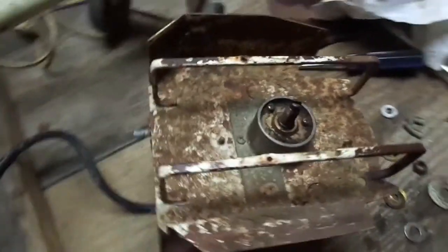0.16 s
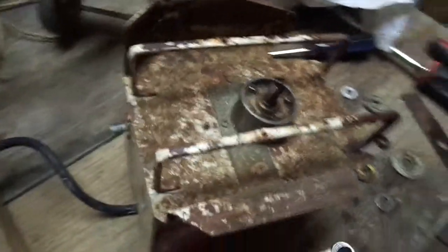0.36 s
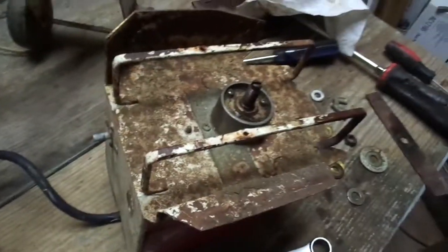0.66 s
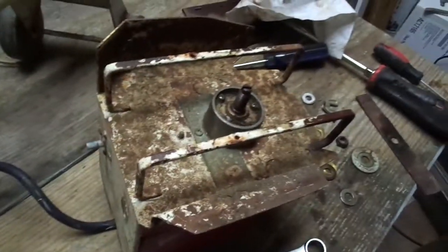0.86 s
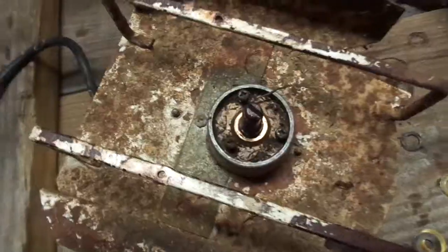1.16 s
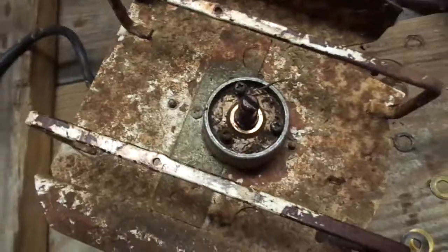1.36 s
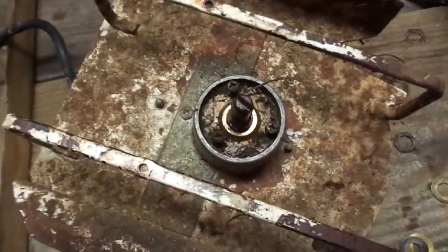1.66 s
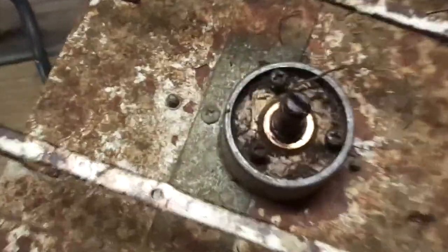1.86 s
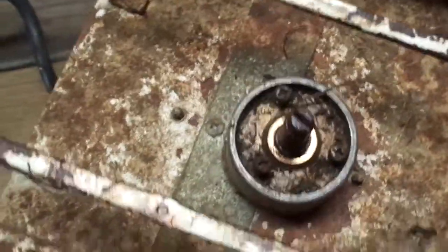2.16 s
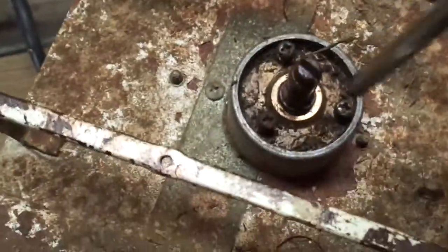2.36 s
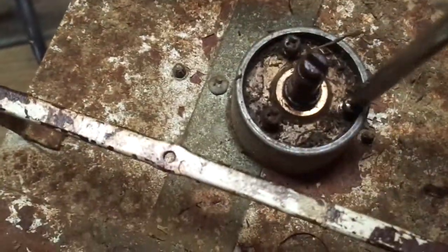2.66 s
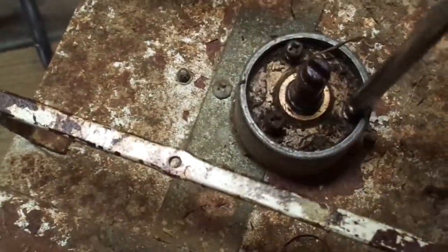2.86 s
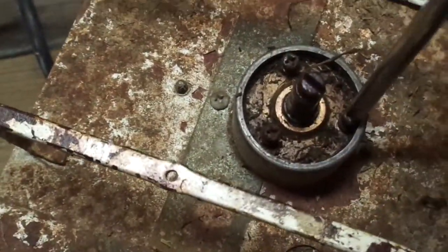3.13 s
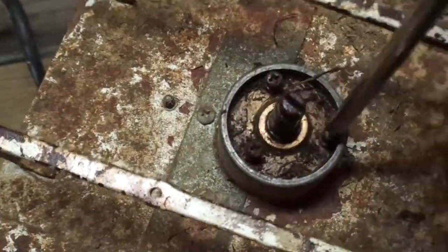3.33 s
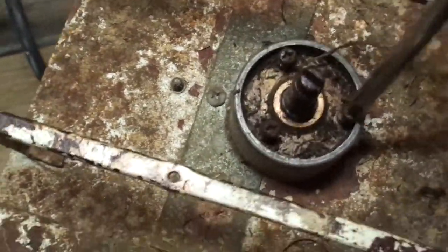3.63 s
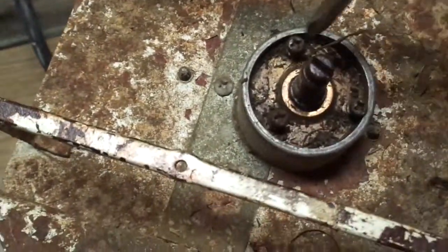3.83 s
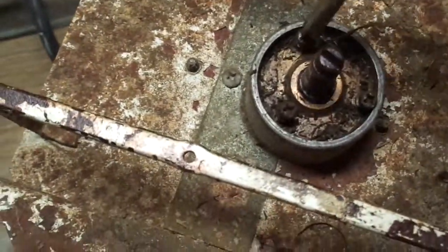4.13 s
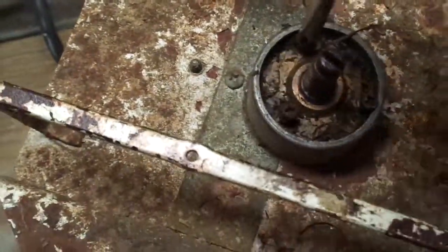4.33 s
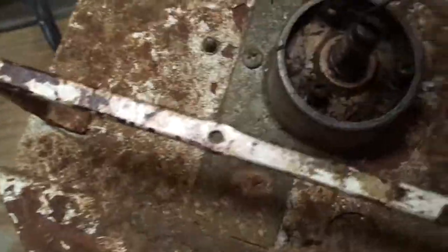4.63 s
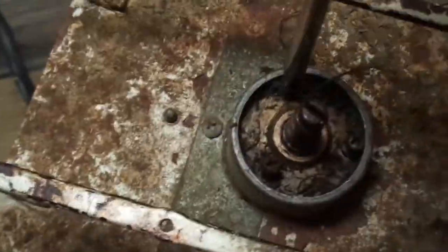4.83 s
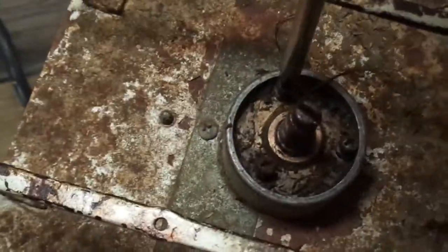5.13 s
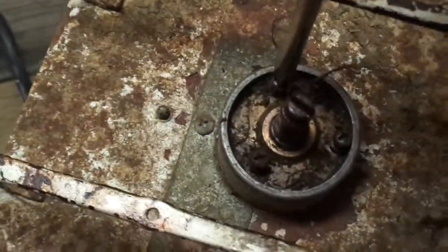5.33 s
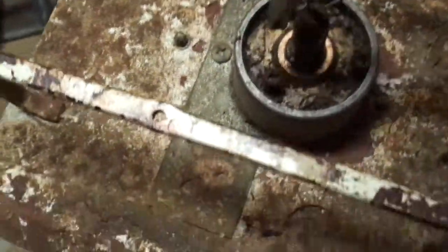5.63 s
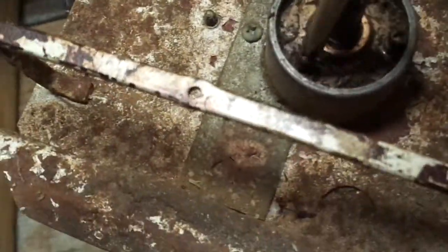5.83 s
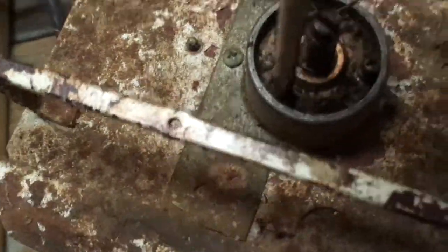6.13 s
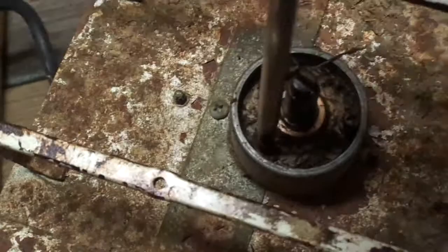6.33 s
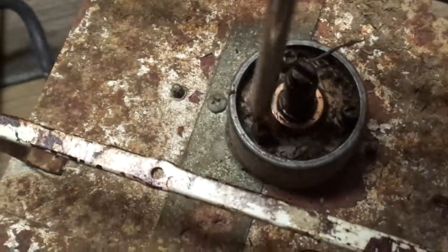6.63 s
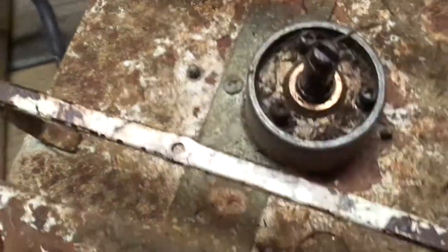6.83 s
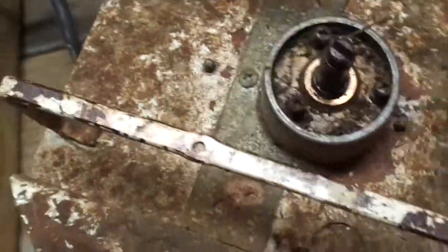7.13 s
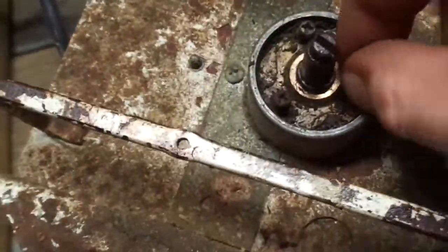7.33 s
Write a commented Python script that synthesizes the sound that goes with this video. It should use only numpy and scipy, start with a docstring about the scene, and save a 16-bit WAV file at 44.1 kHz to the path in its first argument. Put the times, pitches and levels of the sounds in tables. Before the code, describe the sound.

A brief brushing rustle over hum, a blank silence, then close ticks, creaks, metal clacks, faint screwdriver scrapes and a loud clatter on a sheet-metal housing.

```python
"""On a wooden bench in a workshop, a screwdriver picks and taps at the bearing rim of a motor in sheet metal.
Close to the microphone, the hand-held recorder ticks, creaks and thuds in the grip: snaps, slips and low pushes.
Loose steel parts clack against the housing; cracks set decaying modes ringing, with a short dull echo.
A brushing rustle (coloured noise) over mains hum comes first, then half a second of silence,
then a faint steady whine (sines) and workshop air (noise) under everything."""
import sys
import numpy as np
from scipy import signal
from scipy.fft import rfft, irfft
from scipy.io import wavfile

SR = 44100
rng = np.random.default_rng(int(sys.argv[2]) if len(sys.argv) > 2 else 0)


def int16_out(signal):
    """Quantize to a 16-bit WAV file."""
    q = np.round(np.clip(np.atleast_2d(signal).T, -1, 1) * 32767)
    wavfile.write(sys.argv[1], SR, q.astype(np.int16))


N = 330390
T = np.arange(N) / SR  # time in the scene, s
AGE = np.arange(16384) / SR  # time since a contact, s


def amp(db):
    """Decibels to gain."""
    return 10 ** (np.asarray(db) / 20)


def unit(x):
    """Scale to rms 1."""
    return x / np.sqrt(np.mean(x ** 2))


def add(out, s, x):
    """Mix x into out from time s on."""
    i = max(int(s * SR), 0)
    out[i:i + len(x)] += x[:len(out) - i]


def band(x, lo_hz, hi_hz, order=2):
    """Causal band-pass."""
    edges = [lo_hz, min(hi_hz, SR / 2 - 1000)]
    return signal.sosfilt(signal.butter(order, edges, "band", fs=SR, output="sos"), x)


def colour(x, points):
    """Shape the spectrum of x by (f/Hz, level/dB) points, joined along log frequency."""
    hz, db = np.transpose(points)
    f = np.maximum(np.fft.rfftfreq(len(x), 1 / SR), 1)
    gain = amp(np.interp(np.log(f), np.log(hz), db))
    return irfft(rfft(x) * gain, len(x))


def walk(rate):
    """Random drift of spread near 1, with `rate` new values a second joined by straight lines."""
    knots = rng.standard_normal(4096)
    return np.interp(T * rate, np.arange(len(knots)), knots)


def fade(t60):
    """Decay by 60 dB in t60 seconds."""
    return np.exp(-np.log(1000) * AGE / t60)


# the opening brush, before trims: t/s, mids level/dB, treble level/dB
RUSTLE_LEVELS = [(0.0, -45, -50), (0.066, -39.5, -44.5), (0.08, -39.5, -47), (0.104, -51, -49.5),
                 (0.248, -54, -58), (0.316, -50, -52.5), (0.348, -55.5, -59), (0.57, -67.5, -80)]
# tone of the brush: f/Hz, relative level/dB per Hz
RUSTLE_COLOUR = [(290, -43), (500, -13.5), (724, -8), (788, -2), (859, -8.5), (1350, -3.5), (1990, -4),
                 (2360, -12.5), (3000, -18), (3510, -14), (4600, -17.5), (5160, -16.5), (11900, -29.5),
                 (15000, -31.5)]


def rustle(grain_db=3, mid_trim_db=-1, treble_trim_db=-1, low_hz=1150, split_hz=2500):
    """A soft brushing that dies away: grainy noise whose mids and treble follow their own levels."""
    s, mid_db, treble_db = np.transpose(RUSTLE_LEVELS)
    grains = colour(rng.standard_normal(N) * amp(grain_db * walk(500)), RUSTLE_COLOUR)
    mids = unit(band(grains, low_hz, split_hz, order=2))
    treble = unit(band(grains, split_hz, 14000, order=3))
    mid_gain = amp(np.interp(T, s, mid_db) + mid_trim_db)
    treble_gain = amp(np.interp(T, s, treble_db) + treble_trim_db)
    return mids * mid_gain + treble * treble_gain


# mains hum before the pause: f/Hz, mean rms level/dB
HUM = [(119.8, -72), (239.6, -63), (480, -70), (599.9, -76.5)]
# faint whine after the pause: f/Hz, mean rms level/dB
WHINE = [(177, -80), (358.5, -71), (719.4, -61), (1438.9, -66), (1799, -77)]


def tones(lines, waver=0.4, flutter_db=.5):
    """Electrical tones: sines that waver slightly in phase (radians) and level."""
    out = np.zeros(N)
    for hz, db in lines:
        level = np.sqrt(2) * amp(db + flutter_db * walk(19))
        out += level * np.sin(2 * np.pi * hz * T + waver * walk(4.6))
    return out


# workshop air before the pause: f/Hz, relative level/dB per Hz
EARLY_AIR = [(18, -49), (30, -21), (116, -15), (195, -18.5), (240, -18), (384, -18.5), (472, -16),
             (716, -16), (1200, -20.5), (15000, -30.5)]
# workshop air after the pause: f/Hz, relative level/dB per Hz
AIR = [(25, 0), (80, -18), (160, -9), (260, -6), (380, -3.5), (600, -3), (1000, -4), (1800, -2), (3000, -3),
       (4300, -3), (6000, -8.5), (10000, -10.5), (15500, -13.5)]
EARLY_AIR_DB, AIR_DB = -58, -58.5  # rms


def air(points, db):
    """Steady background hiss: coloured noise."""
    return unit(colour(rng.standard_normal(N), points)) * amp(db)


def grip_hiss(db=-64, end=2.1, flutter_db=-3.5, low_hz=10000, swell_s=1.19, swell_length=0.026, swell_db=-55):
    """A faint high rubbing while the hand settles after the pause: fluttering noise with one brief swell."""
    rub = rng.standard_normal(N) * amp(flutter_db * walk(19.4))
    steady = amp(db) * unit(band(rub, low_hz, 14300, order=1)) * (T < end)
    swell = amp(swell_db) * np.exp(-((T - swell_s) / swell_length) ** 2)
    return steady + swell * unit(band(rub, 3200, 13000, order=1))


def crack(lo_hz, hi_hz, t60, order=2):
    """Brief chatter of a hard contact: decaying random signs within a band."""
    x = band(rng.choice([-1., 1.], len(AGE)) * fade(t60), lo_hz, hi_hz, order)
    return unit(x) * np.sqrt(np.mean(fade(t60) ** 2))


# dry ticks close to the microphone: t/s, relative level/dB, centre f/Hz, ping f/Hz, ping t60/s
TICKS = [(1.114, -27.5, 9800, 4500, .004), (1.1183, -16, 8600, 4430, 0.0035),
         (1.347, -16.5, 5200, 4430, 0.026), (1.4364, -32, 4400, 4800, .016),
         (1.4422, -22.5, 4200, 4800, 0.023), (1.464, -21, 3900, 4300, 0.041),
         (1.667, -20, 5060, 4200, 0.027), (1.7412, -20, 4070, 2820, 0.026), (4.4159, -37, 4600, 4400, .015),
         (5.277, -9, 17000, 4230, 0.017)]


def ticks(snap_t60=0.0029, spread=1.89, ping_db=-18, fizz_db=-33, fizz_t60=0.1):
    """Stiff little snaps with a brief thin ping (a decaying sine) and a fizzy tail."""
    out = np.zeros(N)
    for s, db, hz, ping_hz, ping_t60 in TICKS:
        lo_hz, hi_hz = hz / spread, hz * spread
        snap = crack(lo_hz, hi_hz, snap_t60)
        fizz = amp(fizz_db) * crack(lo_hz, hi_hz, fizz_t60, order=1)
        ping = amp(ping_db) * np.sin(2 * np.pi * ping_hz * AGE) * fade(ping_t60)
        add(out, s, amp(db) * (snap + fizz + ping))
    return out


def ring(modes, scatter_db=4.5, neighbour_db=-7, neighbour_span=0.082, crowd_hz=4000, count=8):
    """Free ring of struck metal; each mode has weaker neighbours, which count for more in the treble."""
    hz, db, t60 = np.transpose(modes)
    near_hz = hz * (1 + neighbour_span * rng.uniform(-1.223, 1, (count, len(hz))))
    near_db = db + neighbour_db + 20 * np.log10(np.minimum(hz / crowd_hz, 1))
    hz = np.r_[hz, near_hz.ravel()]
    db = np.r_[db, np.tile(near_db, count)]
    t60 = np.tile(t60, count + 1)
    # every point of contact weighs the modes differently
    size = amp(db + scatter_db * rng.standard_normal(len(hz)))
    phase = rng.uniform(0, 2 * np.pi, len(hz))
    waves = np.sin(np.float32(2 * np.pi * hz[:, None] * AGE + phase[:, None]))
    decays = np.exp(np.float32(-np.log(1000) * np.minimum(AGE / t60[:, None], 2)))
    return size @ (waves * decays) / np.sqrt(np.sum(size ** 2) / 2)


# the housing's countless weaker modes: f/Hz, relative level/dB per Hz, t60/s
PLATE = [(120, -9, 0.88), (265, -19, 0.19), (425, 7, 0.12), (995, 10, 0.11), (2000, 8.5, 0.13),
         (3580, 3.5, 0.14), (5000, 3, 0.11), (7000, -5, 0.18), (11000, -8, 0.18), (16000, -64, .06)]


def plate():
    """Dense ring of the sheet metal: noise bands that decay separately, longest at the bottom."""
    hz, db, t60 = np.transpose(PLATE)
    noise = colour(rng.standard_normal(len(AGE)), np.c_[hz, db])
    spectrum = rfft(unit(noise))
    log_f = np.log(np.fft.rfftfreq(len(AGE), 1 / SR) + 1)
    out = np.zeros(len(AGE))
    for share, decay in zip(np.eye(len(hz)), t60):
        weight = np.interp(log_f, np.log(hz), share)  # overlapping bands that add up to one
        out += irfft(spectrum * weight) * fade(decay)
    return out


# modes of the rim and the loose steel parts, by part: f/Hz, relative level/dB, t60/s
PART_MODES = {"rim": [(488, -5.5, .15), (637, -12, .14), (855, -10, .15), (1242, -11, .12), (1348, -3, .15),
              (1501, -12, .12), (1654, 2, .17), (1846, -5, .09), (2040, -12, .08), (2540, -11, .07),
              (4230, -1, .035)], "bar": [(667, -6, .15), (1340, -6, .19), (3531, -2, .12), (3630, -2, .1),
              (3789, -5, .09), (4188, -5, .08), (4495, -4, .08), (5062, -1, .085), (5400, -7, .07),
              (8800, -19, .06)], "washer": [(3520, -9, .08), (3800, -9, .08), (4312, -3, .07),
              (5921, -2, .07), (6045, 0, .09), (7364, -9, .05), (9496, -8, .06), (9840, -6, .05),
              (11200, -9, .04), (12900, -8, .04), (14500, -9, .04)]}
# hiss of grit under the blade: f/Hz, relative level/dB per Hz
GRIT = [(500, 6), (2000, 3), (4400, 11.5), (6500, 7), (10000, 6.5), (12500, 13.5), (14000, 9), (15600, 2)]


def scrape(swell, ring_db, hiss_db, grain_db=4.0, body_db=-10, low_hz=650, dull_hz=4500):
    """Dense tiny slips swell and fade: they hiss at the blade and ring the rim and housing."""
    metal = ring(PART_MODES["rim"], count=2) + amp(body_db) * plate()
    metal = band(metal, low_hz, dull_hz, order=1)
    grains = rng.standard_normal(len(AGE)) * amp(grain_db * rng.standard_normal(len(AGE)))
    slips = swell * unit(grains)
    body = signal.fftconvolve(slips, metal)[:len(AGE)]
    hiss = colour(slips, GRIT)
    return np.std(slips) * (amp(ring_db) * unit(body) + amp(hiss_db) * unit(hiss))


# twirls of the screwdriver: first stroke t/s, last stroke t/s, relative rim ring level/dB, relative hiss level/dB
TWIRLS = [(2.668, 2.741, -48, -72), (2.995, 3.08, -57, -67), (3.423, 3.659, -61.5, -69),
          (4.749, 5.21, -60.5, -57), (6.236, 6.514, -53, -59.5)]
# short rasps of grit: start t/s, rise t/s, relative hiss level/dB
RASPS = [(1.123, 0.0036, -36), (1.288, 0.0036, -46.5), (2.756, .011, -50), (2.832, 0.004, -48.5),
         (2.99, 0.0056, -53), (4.322, 0.0053, -50.5), (4.339, .005, -52), (4.406, .005, -47.5),
         (4.428, 0.0062, -50), (4.768, 0.0049, -49), (4.841, 0.0063, -54), (6.027, .01, -56.5),
         (6.149, 0.0059, -43), (6.638, 0.0047, -52.5)]


def scrapes(strokes_per_s=11.2, half_stroke_s=0.032, scatter_db=6.5, rasp_ring_db=-19.5):
    """Even twirl strokes scrape the rim, each a little different; grit catches fast, lets go slowly and hisses."""
    out = np.zeros(N)
    stroke = np.sin(np.pi * np.minimum(AGE / (2 * half_stroke_s), 1)) ** 4
    for first, last, ring_db, hiss_db in TWIRLS:
        count = round((last - first) * strokes_per_s) + 1
        for s in np.linspace(first, last, count):
            size = amp(scatter_db * rng.standard_normal())
            add(out, s - half_stroke_s, size * scrape(stroke, ring_db, hiss_db))
    for s, rise, db in RASPS:
        catch = AGE / rise * np.exp(1 - AGE / rise)
        add(out, s, scrape(catch, db + rasp_ring_db, db))
    return out


# the grip creaks: t/s, slips per second, relative slip level/dB
CREAK = [(1.471, 240, -44), (1.529, 393, -40.5), (1.645, 470, -35.5), (1.69, 217, -45), (1.721, 60, -35.5),
         (1.929, 30, -37)]


def creak(low_hz=3100, slow_top_hz=4300, hz_per_slip_rate=3.3, scatter_db=2.0, gain_db=3, slip_t60=0.0084,
          unevenness=.33):
    """Stick and slip in the grip: a fast run of tiny ragged snaps that slows to single, duller ones."""
    s, rate, db = np.transpose(CREAK)
    out, now = np.zeros(N), s[0]
    for gap, size, *chatter in rng.standard_normal(size=(200, 256)):
        if now >= s[-1]:
            break
        speed = np.interp(now, s, rate)
        top_hz = slow_top_hz + hz_per_slip_rate * speed
        snap = band(np.sign(chatter) * fade(slip_t60)[:len(chatter)], low_hz, top_hz, order=3)
        add(out, now, snap * amp(np.interp(now, s, db) + gain_db + scatter_db * size))
        now += np.exp(unevenness * gap) / speed
    return out


# blows: t/s, what is struck, relative body level/dB, relative crack level/dB, crack centre f/Hz
BLOWS = [(1.969, "housing", -32.5, -37, 3300), (1.9784, "housing", -33.5, -34, 2900),
         (1.983, "housing", -34.5, -28, 2660), (2.024, "washer", -36, -34, 3380),
         (2.027, "washer", -37, -21, 3700), (2.0719, "bar", -29, -28, 3350),
         (2.1523, "washer", -38.5, -22, 5000), (3.194, "rim", -47.5, -46, 4400),
         (3.534, "rim", -46.5, -47, 4400), (5.0296, "rim", -37.5, -22.5, 3200),
         (5.32, "rim", -53, -43, 5470), (5.3336, "housing", -41.5, -35, 3300),
         (5.776, "rim", -47, -28, 7000), (5.9322, "rim", -41.5, -32, 4600),
         (6.1193, "rim", -54.5, -45, 4540), (6.9738, "bar", -23, -23, 3270),
         (6.9935, "bar", -27, -30.5, 3760), (7.0452, "housing", -24, -14, 1700),
         (7.05, "housing", -15, -10.5, 2740), (7.06, "housing", -22, -18.5, 2000),
         (7.0702, "housing", -30, -19.5, 2200), (7.1485, "housing", -28.5, -41, 2110)]
# main modes of the housing: f/Hz, relative level/dB, t60/s
HOUSING_MODES = [(387, 0, .2), (465, -4, .16), (495, -1, .18), (640, -4, .16), (675, -1, .18),
                 (772, -5, .15), (860, -5, .16), (985, 2, .17), (1055, -6, .16), (1207, -1, .18),
                 (1340, 0, .19), (1515, -1, .14), (1582, -2, .18), (1773, -1, .14), (1997, 0, .16),
                 (2080, -5, .12), (2412, -6, .16), (2535, -1, .14), (2783, -2, .16), (2903, -1, .13),
                 (3140, -5, .12), (3364, -2, .12)]
# how much louder a struck part rings, by part: relative level/dB
PART_DB = {"rim": 5, "bar": 0, "washer": 8.5}
# how high the housing answers, by what is struck: f/Hz
BRIGHT_HZ = {"rim": 3200, "bar": 1580, "washer": 4200, "housing": 3620}


def blows(modes_db=-2, dense_db=2.0, crack_t60=0.013, crack_spread=2.02, low_hz=390):
    """Each blow cracks, rings the part hit and shakes the housing, as high up as what is struck allows."""
    out = np.zeros(N)
    for s, part, db, crack_db, crack_hz in BLOWS:
        housing = amp(modes_db) * ring(HOUSING_MODES, count=0) + amp(dense_db) * plate()
        body = band(housing, low_hz, BRIGHT_HZ[part]) / np.sqrt(2)
        if part in PART_MODES:
            part_ring = ring(PART_MODES[part], neighbour_db=-4.0, neighbour_span=.09)
            body = body + amp(PART_DB[part]) * part_ring
        contact = crack(crack_hz / crack_spread, crack_hz * crack_spread, crack_t60, order=3)
        add(out, s, amp(db) * body + amp(crack_db) * contact)
    return out


def room(x, db=-23, t60=0.28, low_hz=350, top_hz=2200, delay=0.0035):
    """The short, dull echo of a cluttered workshop: convolution with decaying noise."""
    response = band(rng.standard_normal(len(AGE)), low_hz, top_hz) * fade(t60) * (AGE > delay)
    response = response / np.sqrt(np.sum(response ** 2))
    return amp(db) * signal.fftconvolve(x, response)[:N]


# firm bumps of hand and bench: t/s, peak level/dB
THUDS = [(1.974, -38.5), (4.464, -46.5), (6.106, -48.5), (6.154, -53), (6.34, -55), (6.432, -51),
         (6.495, -43), (6.59, -36)]
# spells of lighter bumps as the grip shifts: from t/s, to t/s, typical peak level/dB
FIDGETS = [(4.7, 5.35, -67), (5.9, 6.55, -62)]


def thuds(low_share=0.31, firm_db=-36, firm_hz=490, db_per_octave=18, bumps_per_s=13, scatter_db=2):
    """Single dull pushes through bench and recorder case; the firmer the push, the higher it reaches."""
    out, bumps = np.zeros(N), list(THUDS)
    for start, end, db in FIDGETS:
        gaps = rng.exponential(size=64) / bumps_per_s
        sizes = rng.standard_normal(size=64)
        for s, size in zip(start + np.cumsum(gaps), sizes):
            if s < end:
                bumps.append((s, db + scatter_db * size))
    impulse = 1. * (AGE == 0)
    for s, db in bumps:
        hz = firm_hz * 2 ** ((db - firm_db) / db_per_octave)
        push = band(impulse, hz * low_share, hz, order=2)
        add(out, s, amp(db) * push / np.abs(push).max())
    return out


# the silence: from t/s, to t/s
PAUSE = (.58, 1.111)


def scene(side_db=-34, side_hiss_db=-82):
    """Nearly mono: the channels differ only by a trace of the treble and a little hiss."""
    metal = blows() + scrapes()
    before = rustle() + tones(HUM) + air(EARLY_AIR, EARLY_AIR_DB)
    handling = ticks() + thuds() + creak() + grip_hiss()
    after = metal + room(metal) + handling + tones(WHINE) + air(AIR, AIR_DB)
    mono = np.where(T < PAUSE[0], before, after)
    # f/Hz, relative level/dB per Hz
    side_colour = [(40, 8.5), (250, 16.5), (1000, 9.5), (4000, -11), (16000, 18.5)]
    side_hiss = unit(colour(rng.standard_normal(N), side_colour))
    side = amp(side_db) * band(mono, 6700, 16000) + amp(side_hiss_db) * side_hiss
    audible = (T < PAUSE[0]) | (T > PAUSE[1])
    return np.array([mono + side, mono - side]) * audible


def record(dry, top_hz=16200):
    """The recorder cuts the top steeply: an elliptic low-pass."""
    return signal.sosfilt(signal.ellip(10, .2, 75, top_hz, fs=SR, output="sos"), dry)


dry = scene()
out = record(dry)
int16_out(out)
```